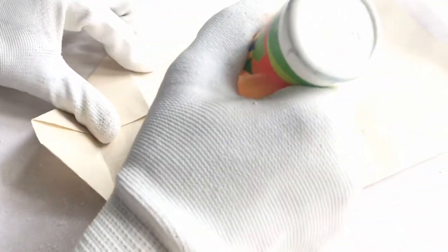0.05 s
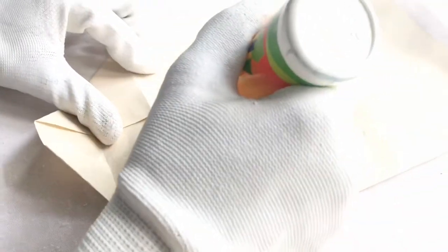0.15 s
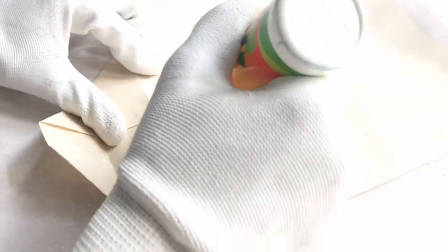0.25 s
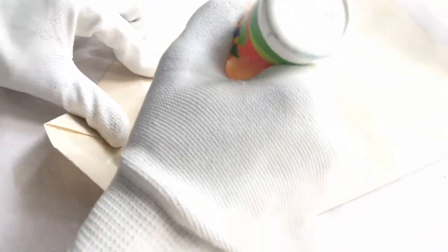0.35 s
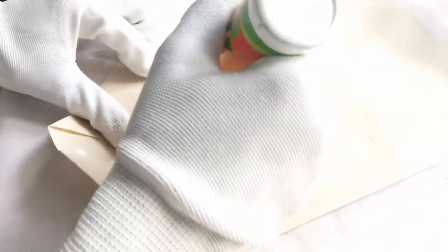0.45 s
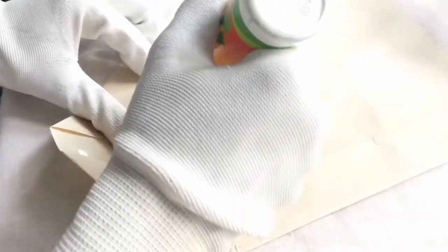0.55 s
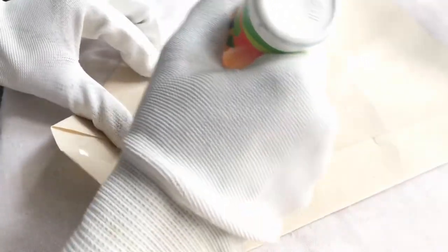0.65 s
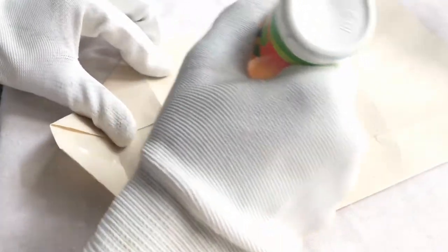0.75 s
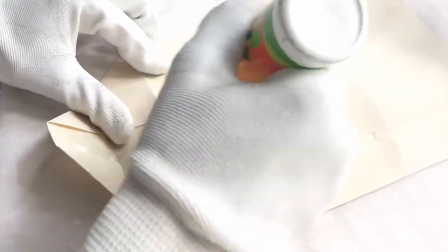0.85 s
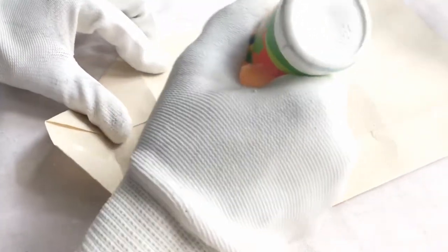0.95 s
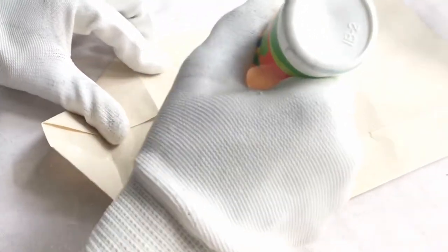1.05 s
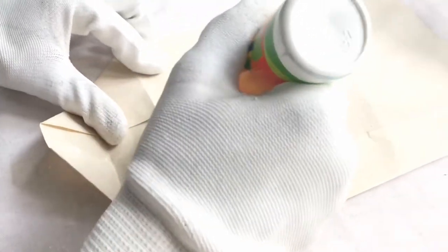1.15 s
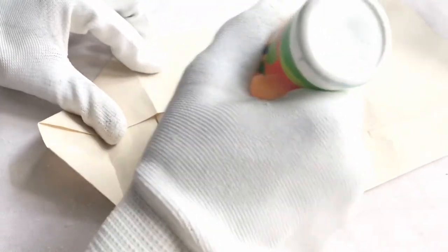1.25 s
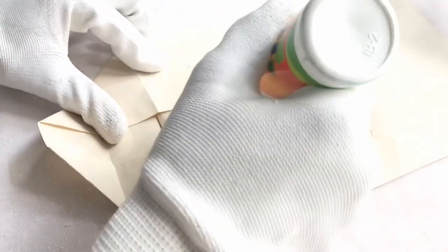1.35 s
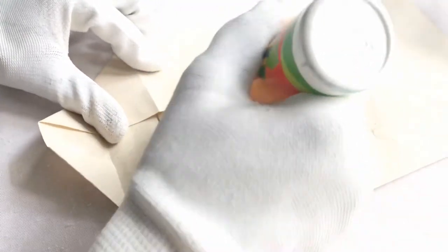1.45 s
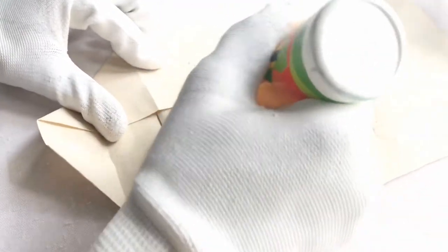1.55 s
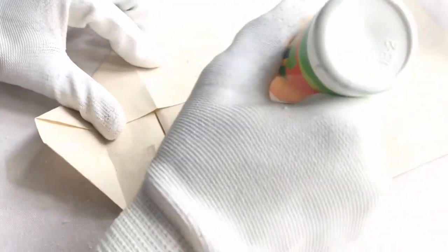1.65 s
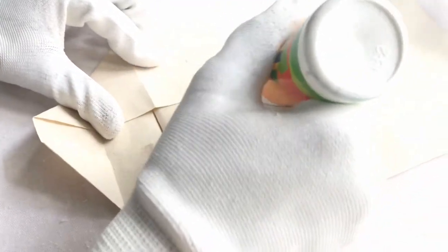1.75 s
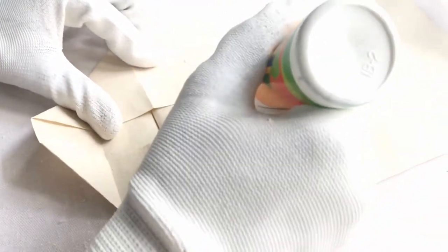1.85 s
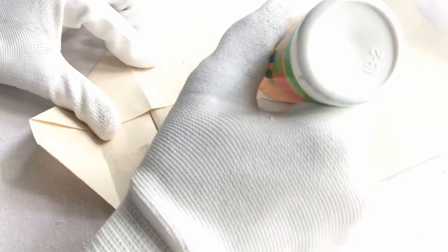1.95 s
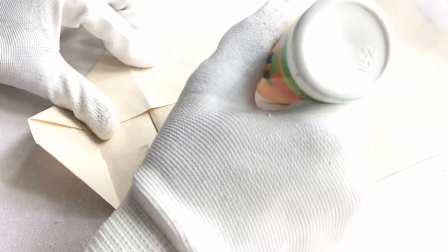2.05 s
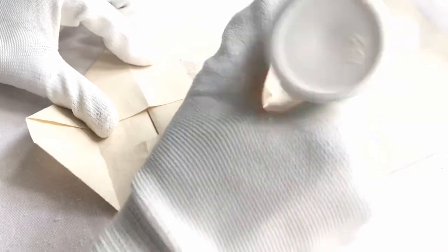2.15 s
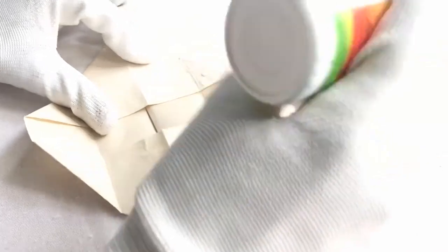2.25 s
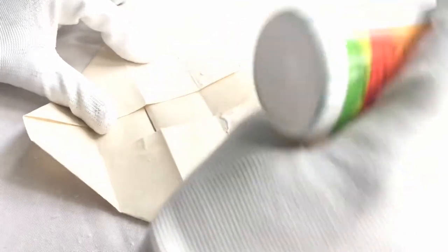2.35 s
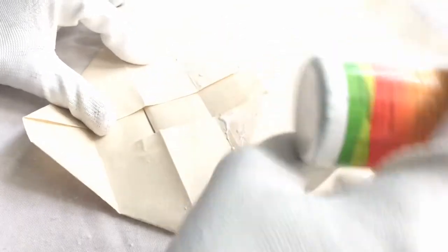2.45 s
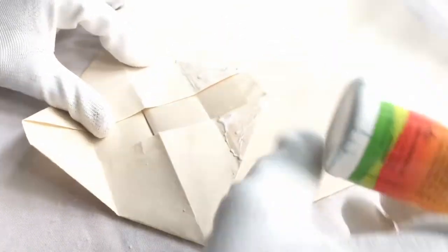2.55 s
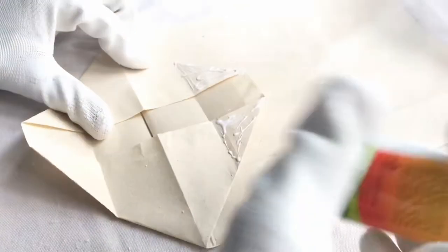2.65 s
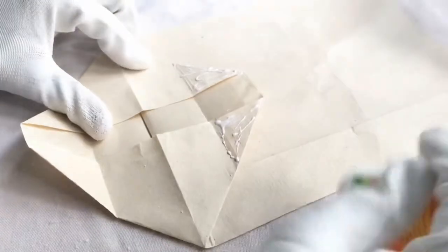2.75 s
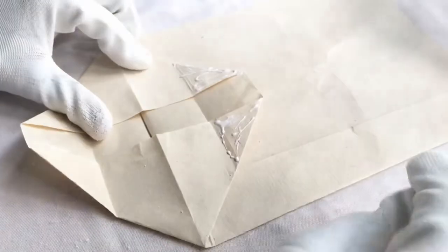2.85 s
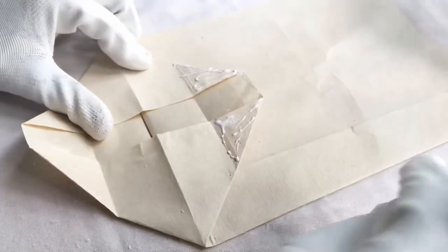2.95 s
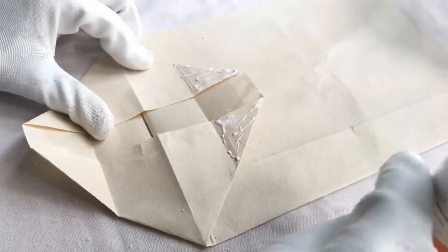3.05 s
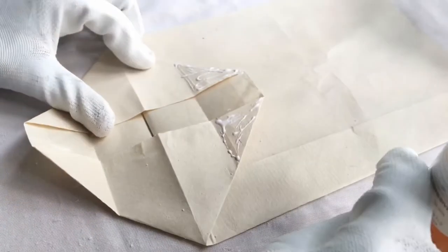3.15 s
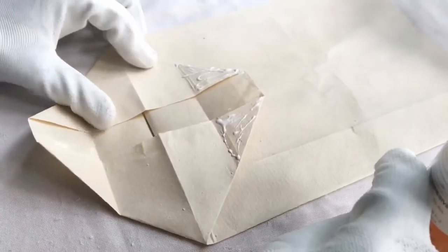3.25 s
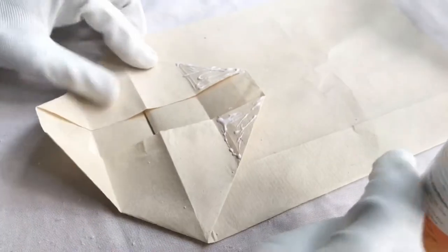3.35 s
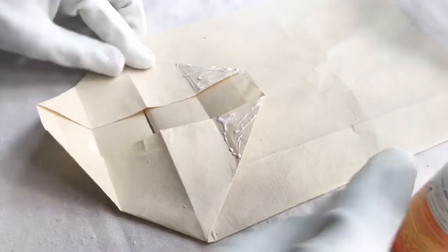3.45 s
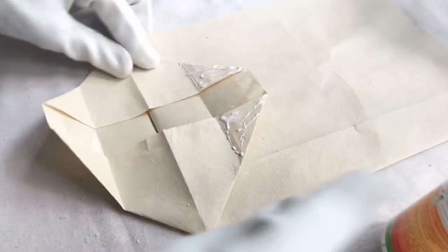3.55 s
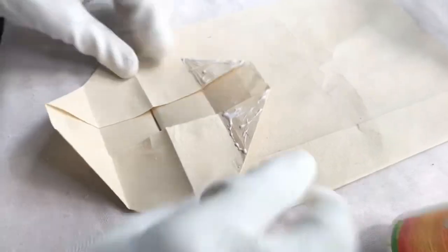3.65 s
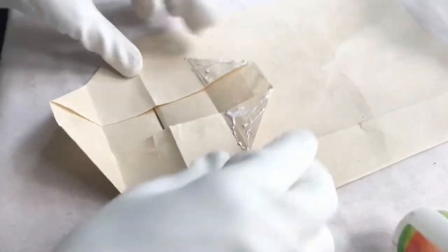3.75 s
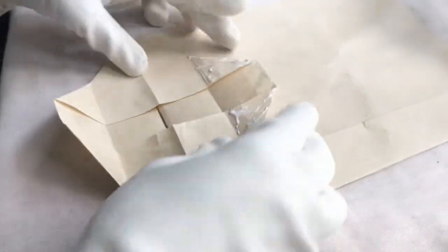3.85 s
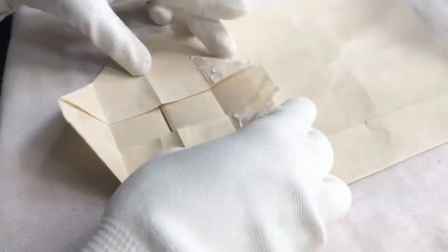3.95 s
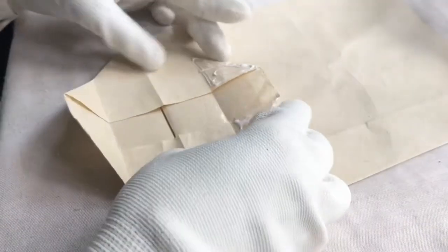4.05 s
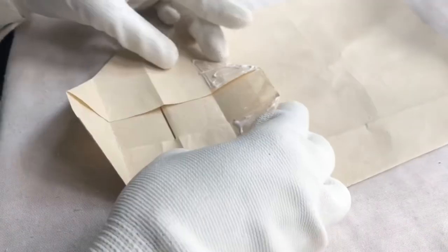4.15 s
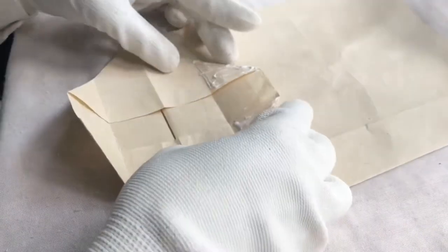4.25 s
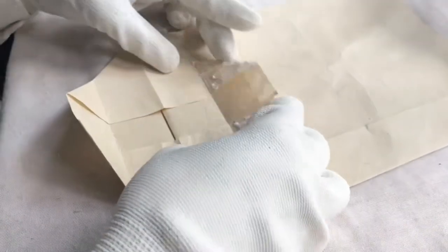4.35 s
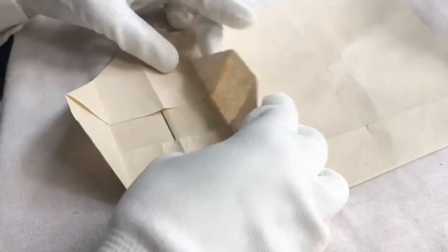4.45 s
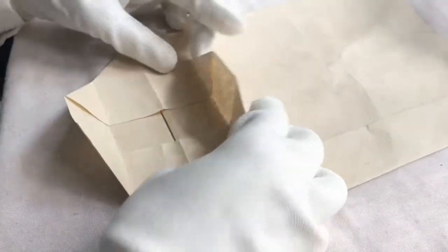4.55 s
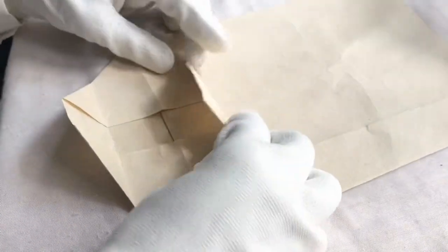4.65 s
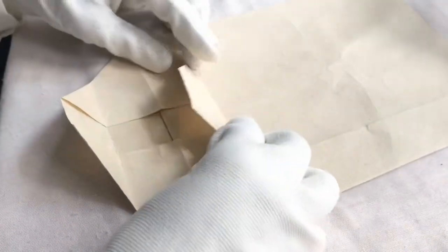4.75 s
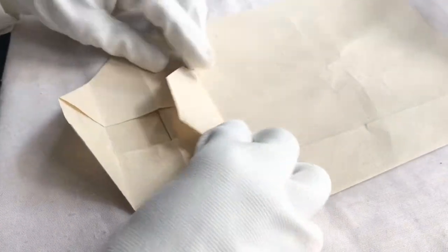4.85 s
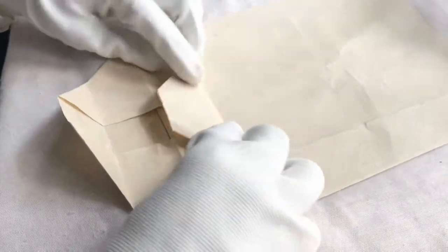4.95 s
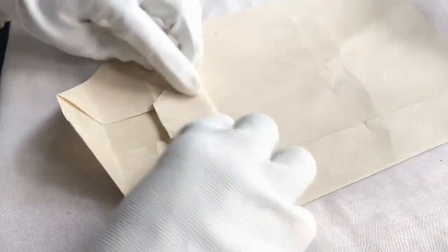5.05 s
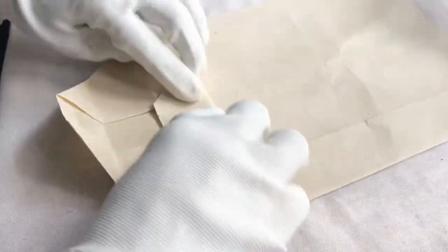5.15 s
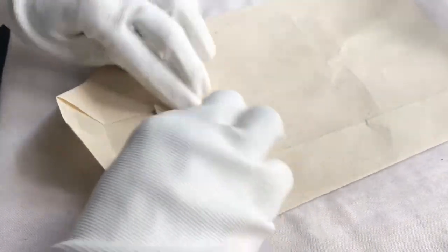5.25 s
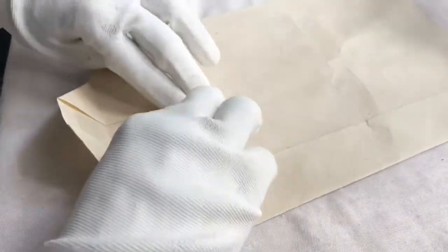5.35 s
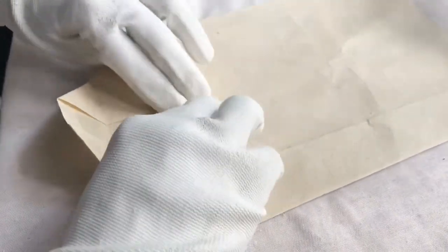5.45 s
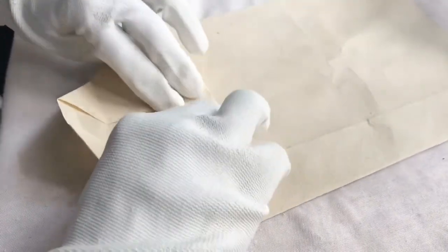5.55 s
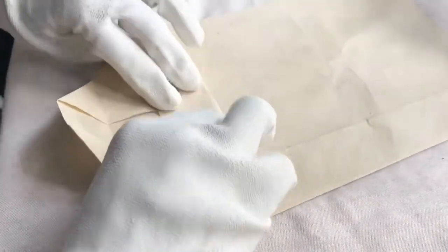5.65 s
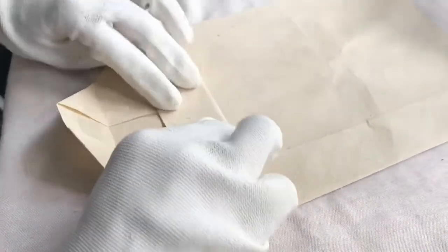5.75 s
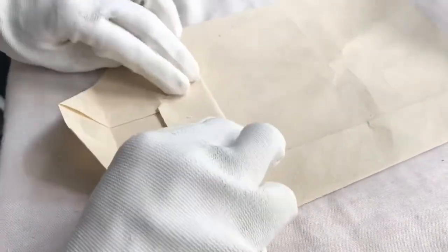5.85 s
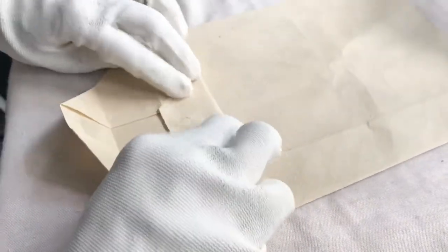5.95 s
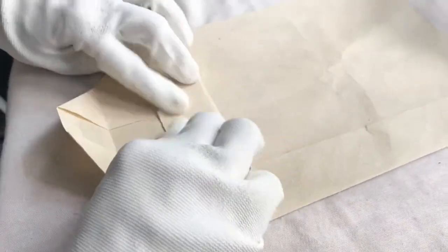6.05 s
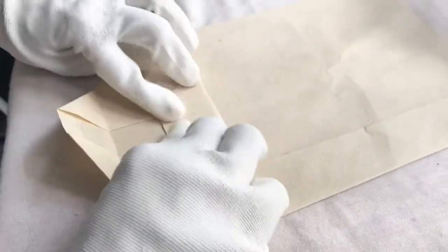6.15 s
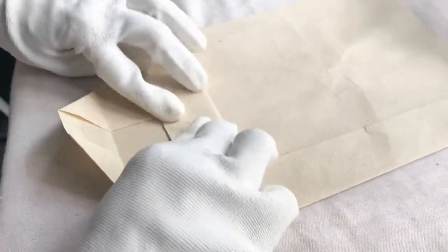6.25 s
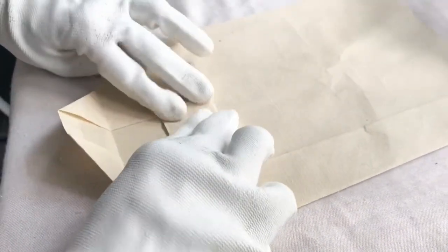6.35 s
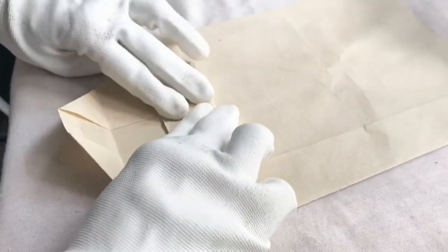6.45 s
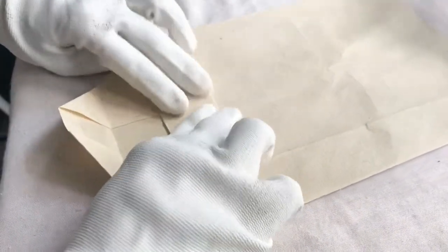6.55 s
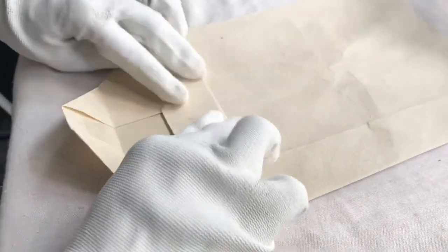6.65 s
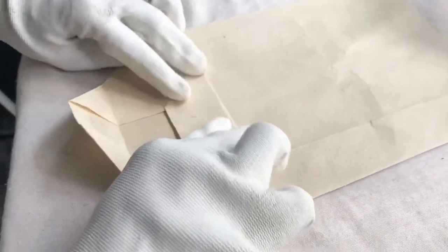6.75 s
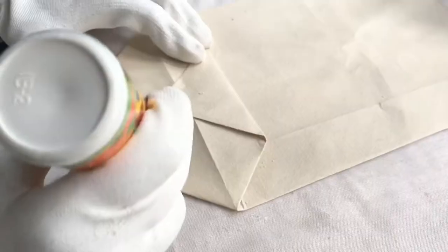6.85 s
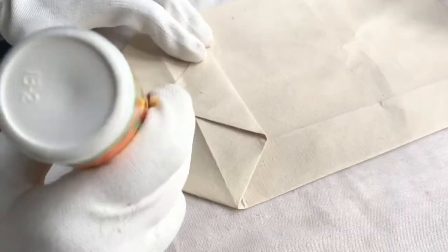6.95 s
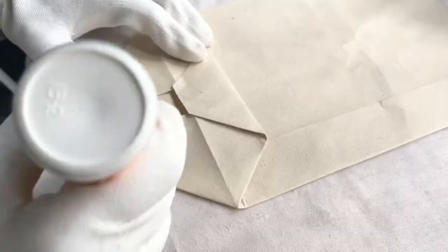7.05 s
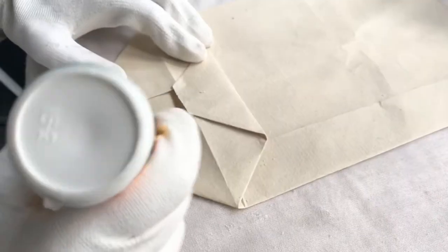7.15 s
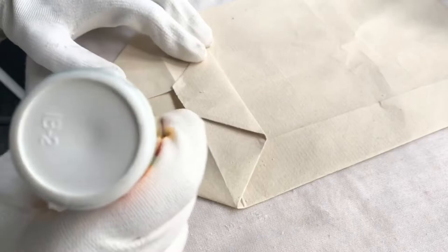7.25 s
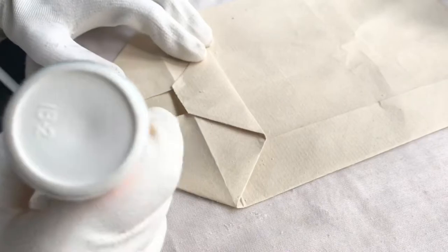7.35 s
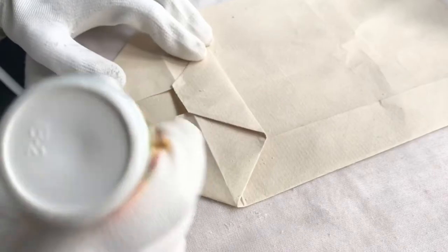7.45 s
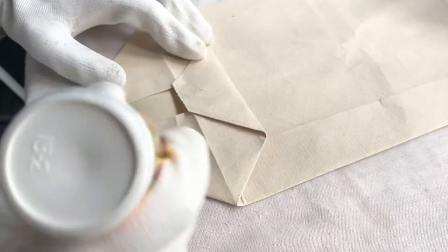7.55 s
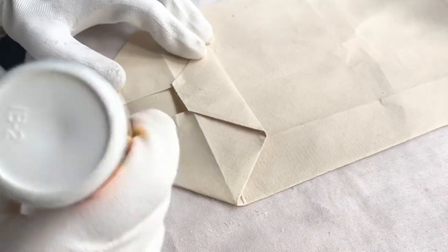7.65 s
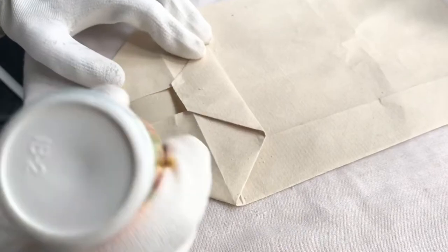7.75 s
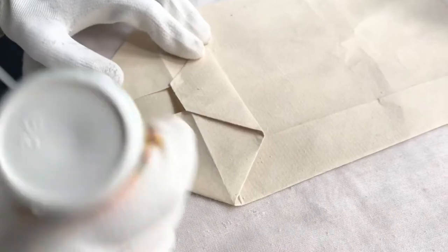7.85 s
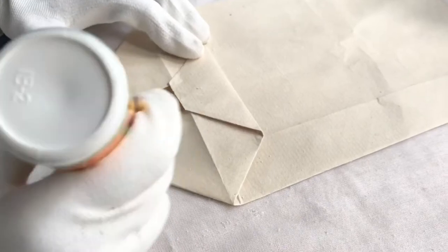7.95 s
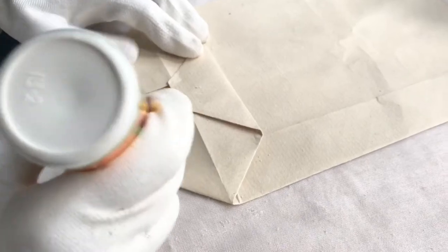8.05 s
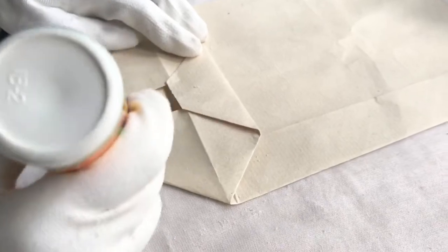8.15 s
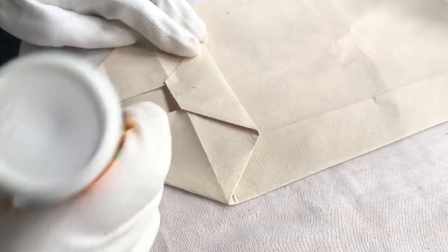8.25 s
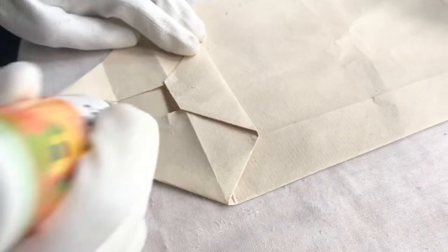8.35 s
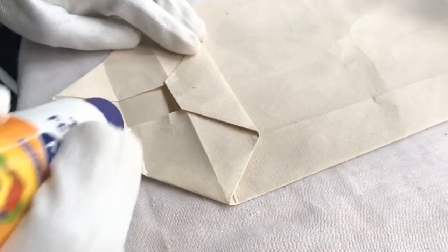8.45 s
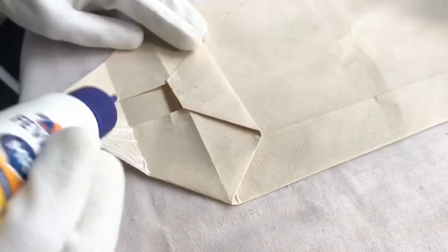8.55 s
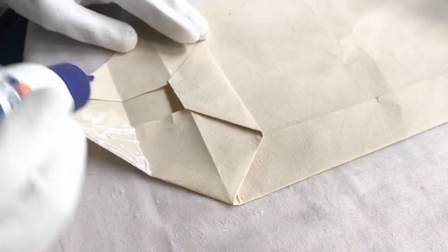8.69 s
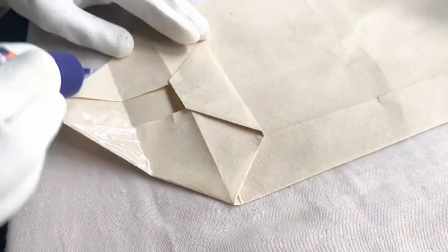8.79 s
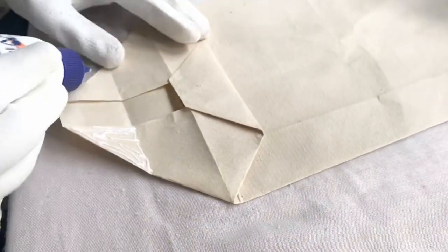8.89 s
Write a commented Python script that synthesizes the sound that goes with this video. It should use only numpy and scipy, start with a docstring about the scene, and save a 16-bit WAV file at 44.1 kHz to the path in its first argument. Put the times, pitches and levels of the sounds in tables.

```python
"""A plastic bottle's nozzle rubs glue over a paper bag, close to the microphone, in strokes of tiny slips.
Gloved hands fold and smooth the paper, and its creases snap. Set down on the wooden table, the bottle
tips over and bounces, booming the board and ringing its own wall. From the street outside come traffic,
engines, a far horn and squeals. The sound fades out and in once, and the street is louder after it."""
import sys
import numpy as np
from scipy import signal
from scipy.fft import rfft, irfft, next_fast_len
from scipy.io import wavfile
from scipy.ndimage import uniform_filter1d

SR = 44100
rng = np.random.default_rng(int(sys.argv[2]) if len(sys.argv) > 2 else 0)


def wrap_up_sound(samples):
    """Save the sound to the file named by the first command line argument, as 16-bit audio."""
    columns = np.atleast_2d(samples).T
    # keep every value between -1 and 1, then stretch to whole-number steps
    tamed = np.clip(columns, -1, 1)
    steps = np.round(tamed * 32767).astype(np.int16)
    wavfile.write(sys.argv[1], SR, steps)


N = 393372
FADE_S = 6.74  # the sound dips to silence here; the bag's second flap is glued after it

# The nozzle, close to the microphone. Each row: start and end in seconds, level in dB.
NOZZLE_STROKES = [(0.562, 0.622, -55.5), (0.603, .70, -55), (0.732, 0.818, -53), (0.864, .955, -54.5),
                  (1.031, 1.091, -53.5), (1.075, 1.138, -62), (1.154, 1.266, -53.5), (1.334, 1.428, -51),
                  (1.45, 1.587, -54), (1.67, 1.738, -62), (1.956, 2.04, -65), (6.912, 6.986, -52.5),
                  (6.968, 7.045, -60.5), (7.03, 7.139, -51.5), (7.194, 7.275, -51), (7.328, 7.433, -50.5),
                  (7.472, 7.56, -51.5), (7.61, 7.709, -56.5), (7.759, 7.856, -54.5)]
# One spectrum a flap, the bottle held at two angles. Each row: frequency in Hz, relative level in dB.
FLAP_SPECTRA = [
    [(500, -27), (700, -5), (1250, -13), (1890, -3), (2420, -12), (3060, -0.5), (3600, -7.5), (4310, 3),
     (4900, -10.5), (5900, -10), (7700, -16.5), (8800, -16.5), (11700, -20), (15800, -28)],
    [(400, -27), (750, -1.5), (1300, -13), (1900, -5.5), (2380, -12), (2900, -4.5), (3420, -8),
     (3950, -1.5), (4560, -7.5), (5000, -9), (6500, -9.5), (7400, -9), (8400, -9), (15800, -27.5)],
]

def nozzle():
    """The nozzle scrapes to and fro over the paper, each stroke loudest at its middle."""
    strokes = [((start + end) / 2, (end - start) / 2, (end - start) / 2, db)
               for start, end, db in NOZZLE_STROKES]
    pressure = arches(strokes, fullness=0.7)
    second_flap = np.arange(N) / SR > FADE_S
    return sum(rub(pressure * flap, spectrum, grain_db=2.0, catch_db=0.6, patch_db=2.5)
               for flap, spectrum in zip([~second_flap, second_flap], FLAP_SPECTRA))


# Gloves on the bag, close up. Each row: fastest moment, rise and fall in seconds, level in dB.
GLOVE_SLIDES = [(.15, .12, 0.24, -63.5), (2.2, 0.23, .06, -68), (2.37, 0.086, .11, -60),
                (2.7, .03, 0.12, -66), (2.945, .025, .025, -66), (3.22, .21, .1, -49.5),
                (3.365, 0.037, 0.04, -55), (3.43, .12, .1, -60), (3.515, .05, 0.057, -56),
                (3.8, .05, .12, -63), (3.975, .08, .1, -54.5), (4.165, .05, .08, -54),
                (4.1, 0.062, .2, -64), (4.32, 0.066, 0.058, -60.5), (4.56, 0.24, 0.32, -64),
                (4.96, 0.23, 0.16, -56.5), (5.09, 0.063, .05, -50.5), (5.2, 0.11, 0.1, -51),
                (5.5, 0.24, .1, -51.5), (5.76, 0.28, .08, -53.5), (5.88, 0.066, .04, -64.5),
                (5.96, 0.067, 0.065, -49), (6.04, .05, 0.096, -59), (6.15, 0.032, 0.087, -50.5),
                (6.28, 0.16, 0.1, -49), (6.52, 0.092, 0.18, -49.5), (6.71, 0.096, 0.039, -54),
                (7.9, .03, .05, -61), (7.99, .09, 0.15, -53), (8.26, .08, .09, -68), (8.44, .09, .05, -67),
                (8.52, 0.06, 0.22, -58), (8.67, .04, .05, -62), (8.765, .06, 0.042, -50),
                (8.905, 0.041, .04, -59)]
# Their hiss at the microphone. Each row: frequency in Hz, relative level in dB.
GLOVE_SPECTRUM = [(880, -39), (1500, -16), (1740, -9), (2360, -22), (2740, -4), (3790, -2), (4260, 0.5),
                  (4890, -1.5), (5350, 2), (7700, 2.5), (9370, 2.5), (10400, 3), (12600, -1.5), (15800, -9)]

def gloves():
    """Gloves slide over the paper, hissing loudest where they move fastest."""
    pressure = arches(GLOVE_SLIDES, fullness=1.05)
    return rub(pressure, GLOVE_SPECTRUM, grain_db=2.0, catch_db=1.23, patch_db=1.5)


def rub(pressure, spectrum, grain_db, catch_db, patch_db):
    """Dense slips of uneven size over the paper fibres, catching and letting go."""
    slips = rng.standard_normal(N) * undb(grain_db * rng.exponential(size=N))
    sheet = bending_sheet(colour(slips, spectrum), patch_db)
    return sheet * undb(catch_db * walk(90)) * pressure


def bending_sheet(x, spread_db, hold_s=.05, width_hz=120):
    """The sheet bends under the hands, so narrow resonances rise and sink in patches."""
    frames = signal.stft(x, nperseg=512)[2]
    patches = rng.standard_normal(frames.shape)
    for axis, size in enumerate([int(width_hz * 512 / SR) + 1, int(hold_s * SR / 256) + 1]):
        patches = uniform_filter1d(uniform_filter1d(patches, size, axis=axis), size, axis=axis)
    return unit(signal.istft(frames * undb(spread_db * unit(patches)), nperseg=512)[1][:N])


# Creases in the bag, close up. Each row: start in seconds, level in dB, pitch in Hz,
# cycles to fade to 1 / e.
CREASE_SNAPS = [(.5884, -47, 1500, 1.3), (1.05, -42, 4400, 2.5), (1.3498, -40, 4250, 2.5),
                (2.6894, -48, 6500, 1.2), (2.7794, -47, 6500, 1.3), (3.407, -46, 3200, 2.2),
                (3.434, -41, 3260, 1), (3.436, -45, 1000, 1.3), (3.4835, -40, 3600, 1.3),
                (3.5145, -35, 6500, 1.5), (3.863, -43, 7000, 1.5), (3.893, -35, 7000, 0.92),
                (5.1795, -43, 1760, 2.3), (5.6797, -43, 2050, 1.7), (5.68, -43, 3690, 2.5),
                (8.49, -39.5, 4470, 2), (8.511, -38, 5540, 3.6), (8.514, -42, 4000, 2.5),
                (8.523, -42, 5000, 2.2)]

def creases(tick_db=-6, tick_s=.0006):
    """A crease lets go: a few cycles at its own pitch, swelling over the first, under a bright tick."""
    t, out = np.arange(300) / SR, np.zeros(N)
    for start, db, hz, cycles in CREASE_SNAPS:
        snap = np.sin(2 * np.pi * hz * t) * -np.expm1(-t * hz) * np.exp(-t * hz / cycles)
        tick = undb(tick_db) * np.exp(-t / tick_s) * band(rng.standard_normal(len(t)), hz, 14000)
        i = int(start * SR)
        out[i:i + len(t)] += undb(db) * (snap / np.abs(snap).max() + tick)
    return out


# The bottle on the table, near the microphone. Each row: start in seconds, boom in dB, contact in ms,
# wall ring in dB, pitch of the part that lands in Hz, fall away from it in dB per octave squared,
# crack in dB.
BOTTLE_BLOWS = [(2.7715, -21.5, 3.15, -76, 490, 3, -63), (3.541, -38, 2.8, -56, 700, 1, -47),
                (3.7578, -43, 1.5, -28, 1220, 16, -26.5), (3.761, -11, 2.84, -32, 1200, 4, -48),
                (3.7758, -13.7, 0.42, -8.5, 1190, 3.5, -22.5), (3.7836, -25, 0.57, -22, 560, 5, -36),
                (3.805, -22, 1.6, -40, 699, 4, -49), (3.831, -19, 3.4, -50, 606, 4, -58),
                (3.861, -20, 2.1, -41, 700, 4, -40), (3.895, -27.5, 1.2, -32, 600, 8, -58),
                (3.921, -13, 2.6, -56, 500, 4, -63), (3.93, -17, 2.3, -18, 1350, 12, -22),
                (3.9686, -19.5, 1.6, -26, 740, 5.5, -50), (3.994, -20.5, 2.4, -61, 600, 4, -61),
                (4.0295, -15, 1.6, -28, 700, 5.5, -53), (4.082, -21.5, 2.3, -62, 606, 4, -63)]
# Modes of the table top and the bottle wall. Each row: frequency in Hz, relative level in dB,
# seconds to fade by 60 dB.
TABLE_MODES = [(52, -18, 0.24), (77.6, -7.5, 0.089), (126.8, -20.5, 0.2), (174, -7, 0.0713), (247, -2, .11),
               (292, 1.5, .15), (260.2, -17.5, 0.55), (322, -10, 0.084), (408, 1, 0.07), (485, -3, 0.066)]
WALL_MODES = [(555, 2, 0.049), (657, -4, 0.044), (784, -3, 0.033), (930, 0, 0.025), (1090, -7.5, 0.037),
              (1180, -0.5, 0.019), (1420, -6, 0.033), (1506, -11, .03), (1627, 1.5, 0.014), (1783, -4, .02),
              (2015, -4, 0.015), (2510, -5, 0.015), (3000, -5, 0.023), (3200, -14, 0.01), (3820, -9, 0.013)]

def bottle():
    """Each blow booms in the table top, rings the bottle wall and cracks."""
    t, out = np.arange(SR // 2) / SR, np.zeros(N)
    for start, boom_db, contact_ms, wall_db, part_hz, fall_db, crack_db in BOTTLE_BLOWS:
        # a longer contact leaves the quick modes of the board out
        boom = ring(TABLE_MODES, lambda hz: boom_db - 12 * (hz * contact_ms / 1000) ** 2, t, 0.000099)
        wall = ring(WALL_MODES, lambda hz: wall_db - fall_db * np.log2(hz / part_hz) ** 2, t, 0.00037)
        burst = rng.standard_normal(len(t))
        bright = band(burst, 2000, 5500) + undb(-18) * band(burst, 7000, 14500)
        crack = undb(crack_db) * np.exp(-t / 0.0034) * bright
        i = int(start * SR)
        out[i:i + len(t)] += boom + wall + crack
    return out


def ring(modes, drive_db, t, lag_s):
    """Decaying modes; bending waves carry the low ones slower, so they arrive later (lag_s at 1 kHz)."""
    hz, db, t60 = np.transpose(modes)[:, :, None]
    age = np.maximum(t - lag_s * np.sqrt(1000 / hz), 0)
    sense = (-1) ** np.arange(len(modes))[:, None]  # neighbours swing in opposite sense
    swing = np.sin(2 * np.pi * hz * age) * -np.expm1(-age * hz / 0.49)
    return np.sum(sense * undb(db + drive_db(hz)) * swing * np.exp(-np.log(1000) * age / t60), axis=0)


def room(direct, level_db=-20, t60_s=0.43):
    """The room around the table answers with a short, dull tail."""
    t = np.arange(SR // 2) / SR
    tail = rng.standard_normal(len(t)) * np.exp(-np.log(1000) * t / t60_s) * np.minimum(t / 0.0088, 1)
    tail = band(tail, 300, 3550)
    return direct + undb(level_db) * signal.fftconvolve(direct, tail / np.sqrt(np.sum(tail ** 2)))[:N]


# A horn far down the street. Each row: loudest moment, rise and fall in seconds, level in dB.
HORN_BLASTS = [(2.59, 0.21, .3, -62.5)]
# What reaches the microphone from that far. Each row: frequency in Hz, relative level in dB.
HORN_SPECTRUM = [(2000, -30), (2300, -22), (2680, -10.5), (3100, -15), (3450, -7), (3650, 1), (3830, -6),
                 (4100, -15), (4600, -30), (5000, -33)]

def horn(reeds_hz=(383, 456.3)):
    """Overtones of two reeds; each flutters alone on its way between the houses."""
    t, out = np.arange(N) / SR, 0
    for reed_hz in reeds_hz:
        for hz in reed_hz * np.arange(5, 13):
            level = undb(np.interp(hz, *np.transpose(HORN_SPECTRUM)) + 4.0 * walk(27.95))
            out = out + level * np.sin(2 * np.pi * hz * t + 1.6 * walk(30))
    return np.sqrt(2) * out * arches(HORN_BLASTS)


# High sounds, far from the microphone. Each row: loudest moment, rise and fall in seconds, level in dB.
SQUEAL_BURSTS = [(5.7, .2, .3, -78), (6.81, 0.086, .79, -61), (7.63, .06, 0.55, -61.5),
                 (8.28, 0.15, .22, -67), (8.535, .045, 0.065, -62.5), (8.65, .09, .3, -71)]
WHISTLE_BURSTS = [(.17, .15, .25, -81)]
SQUEAK_BURSTS = [(0.51, .07, .1, -72)]
# Their tones. Each row: centre and width in Hz, relative level in dB.
SQUEAL_TONES = [(3035, 17, -4.5), (3110, 30, -3.5), (3176, 24, -4.5), (3290, 20, -9), (3460, 82, -4.5),
                (4103, 20, -19)]
WHISTLE_TONES = [(7240, 130, -3), (8520, 23, -2), (8660, 68, 0), (9650, 55, -9), (12000, 120, -7),
                 (12700, 40, -2)]
SQUEAK_TONES = [(2050, 40, -2), (2700, 30, 0)]

def far_squeals():
    """A shrill squeal, perhaps brakes or horns; at the start, a thin whistle and a faint squeak."""
    squeal = wavering_tones(SQUEAL_TONES) * arches(SQUEAL_BURSTS)
    whistle = wavering_tones(WHISTLE_TONES) * arches(WHISTLE_BURSTS)
    squeak = wavering_tones(SQUEAK_TONES) * arches(SQUEAK_BURSTS)
    return squeal + whistle + squeak


# An engine passing outside. Each row: time in seconds, level in dB.
PASSING_LEVELS = [(6.75, -54), (6.97, -45.5), (7.1, -53.5), (7.5, -52), (8.21, -48), (8.4, -54),
                  (8.74, -55), (8.92, -48)]
# Its low tones. Each row: centre and width in Hz, relative level in dB.
PASSING_TONES = [(66.1, 13, -0.5), (82.2, 14, -3.5), (121.1, 8.7, -8)]

def passing_engine():
    """A passing engine drones unevenly after the fade."""
    return wavering_tones(PASSING_TONES) * level_curve(PASSING_LEVELS)


# An engine idling out in the street. Each row: time in seconds, level in dB.
IDLE_LEVELS = [(0, -55.5), (2, -52), (4.5, -52.5), (5.8, -55), (6.3, -61), (6.74, -52.5), (6.75, -57),
               (8.92, -59)]

def idling_engine(firing_hz=45.8):
    """The firing tone and its fourth harmonic; the speed hunts a little and the level wavers."""
    phase = 2 * np.pi * np.cumsum(firing_hz * (1 + .03 * walk(4.3))) / SR
    hum = sum(undb(db + 3.1 * walk(9)) * np.sin(order * phase) for order, db in [(1, -1), (4, -14.5)])
    return np.sqrt(2) * hum * level_curve(IDLE_LEVELS)


# The far street, heard from indoors. Each row: frequency in Hz, relative level in dB.
STREET_SPECTRUM = [(15, -20), (25, -4), (64, 3.5), (89, 2.5), (104, -16), (184, -14.5), (222, -19.5),
                   (291, -18.5), (461, -30), (542, -29.5), (834, -30), (905, -31.5), (2030, -37.5),
                   (9460, -47), (15800, -58.5)]
# Its traffic. Each row: time in seconds, rumble in dB, roar in dB.
TRAFFIC_LEVELS = [(0, -55, -53), (1.8, -56.5, -56), (2.6, -51, -55.5), (3.2, -62.5, -53), (4.4, -50, -55),
                  (5.2, -61, -55), (5.7, -52, -54.5), (6.3, -60.5, -54.5), (6.74, -58, -52.5),
                  (6.75, -51, -53), (7.2, -50.5, -53), (7.6, -54.5, -52), (8.1, -47, -52.5),
                  (8.5, -56, -52.5), (8.92, -53, -52)]

def street(split_hz=115):
    """Rumble below, roar above, each swelling with the traffic."""
    times, rumble_db, roar_db = np.transpose(TRAFFIC_LEVELS)
    noise = colour(rng.standard_normal(N), STREET_SPECTRUM)
    low = signal.sosfiltfilt(signal.butter(2, split_hz, fs=SR, output="sos"), noise)
    rumble = unit(low) * level_curve(np.c_[times, rumble_db])
    roar = unit(noise - low) * level_curve(np.c_[times, roar_db])
    return rumble + roar


def wavering_tones(tones):
    """Narrow bands of noise, each wavering alone."""
    return sum(undb(db + 1.8 * walk(7))
               * unit(band(rng.standard_normal(N), hz - width / 2, hz + width / 2))
               for hz, width, db in tones)


def arches(events, fullness=1.14):
    """Each event swells and sinks, with squarer shoulders at low fullness; overlaps add as power."""
    t, power = np.arange(0, N, 32) / SR, 0
    for top, rise, fall, db in events:
        angle = np.interp(t, [top - rise, top, top + fall], [0, np.pi / 2, np.pi])
        power = power + undb(2 * db) * np.abs(np.sin(angle)) ** (2 * fullness)
    return np.interp(np.arange(N) / SR, t, np.sqrt(power))


def level_curve(points):
    """Gain from (s, dB) points, silent outside them."""
    return undb(np.interp(np.arange(N) / SR, *np.transpose(points), left=-200, right=-200))


def colour(x, spectrum):
    """Shapes x by (Hz, dB) points joined on a log-frequency axis; rms 1."""
    hz, db = np.transpose(spectrum)
    size = next_fast_len(N)
    bins_hz = np.arange(size // 2 + 1) * SR / size + 1
    response = undb(np.interp(np.log(bins_hz), np.log(hz), db))
    return unit(irfft(rfft(x, size) * response, size)[:N])


def walk(rate_hz):
    """Glides between random levels, rate_hz of them a second; spread near 1."""
    hold = int(SR / rate_hz)
    return 1.3 * uniform_filter1d(np.repeat(rng.standard_normal(N // hold + 1), hold), hold)[:N]


def band(x, lo_hz, hi_hz):
    """Band-pass."""
    return signal.sosfilt(signal.butter(2, [lo_hz, hi_hz], "bandpass", fs=SR, output="sos"), x)


def undb(db):
    """dB to gain."""
    return 10 ** (np.asarray(db) / 20)


def unit(x):
    """Scales to rms 1."""
    return x / np.sqrt(np.mean(x ** 2))


def scene():
    """One microphone: hands, paper and bottle near by, the street far off."""
    rubbing = nozzle() + gloves()
    outside = horn() + far_squeals() + passing_engine() + idling_engine() + street()
    return (rubbing + creases() + room(bottle()) + outside)[None]


# Notches from the microphone housing. Each row: centre and width in Hz, gain in dB.
HOUSING_NOTCHES = [(5000, 120, -3), (7690, 1140, -4), (10400, 1300, -6.5)]
LOW_CUT_HZ, HIGH_CUT_HZ = 41, 15800
FADE_OUT_S, FADE_IN_S = 0.033, 0.031

def record(dry):
    """The housing notches the treble; bass and top are cut, and the sound fades out and in once."""
    for hz, width, db in HOUSING_NOTCHES:
        dry = dry - (1 - undb(db)) * signal.lfilter(*signal.iirpeak(hz, hz / width, fs=SR), dry)
    dry = signal.sosfilt(signal.butter(4, LOW_CUT_HZ, "highpass", fs=SR, output="sos"), dry)
    t = np.arange(N) / SR - FADE_S
    fade = np.clip(np.maximum(-t / FADE_OUT_S, t / FADE_IN_S), 0, 1)
    return signal.sosfilt(signal.ellip(10, .2, 70, HIGH_CUT_HZ, fs=SR, output="sos"), dry * fade)


dry = scene()
out = record(dry)
wrap_up_sound(out)
```